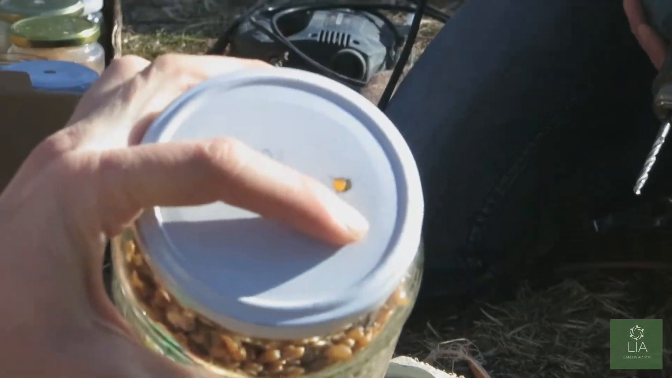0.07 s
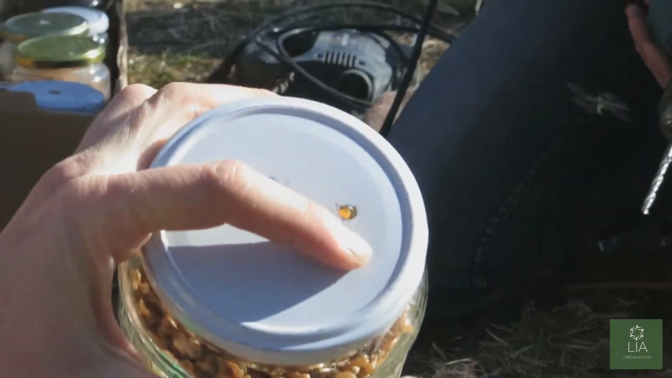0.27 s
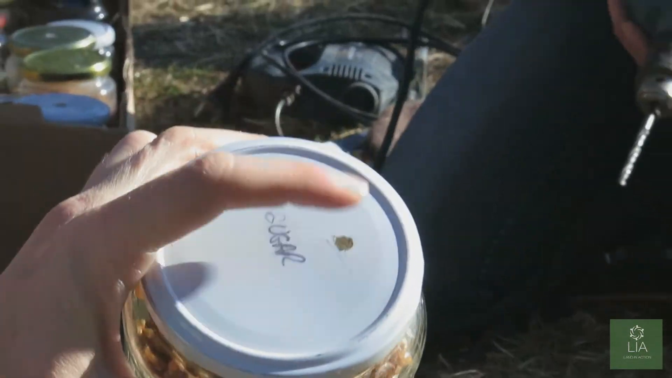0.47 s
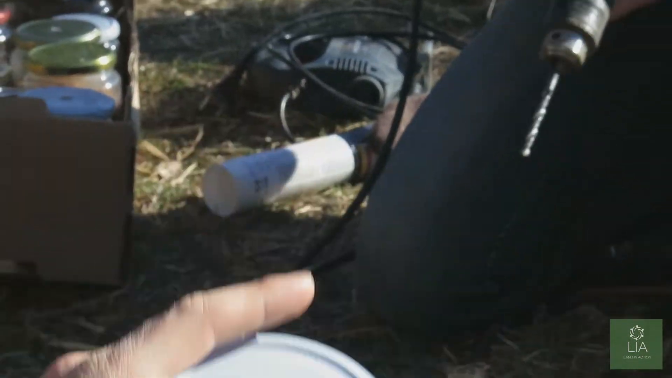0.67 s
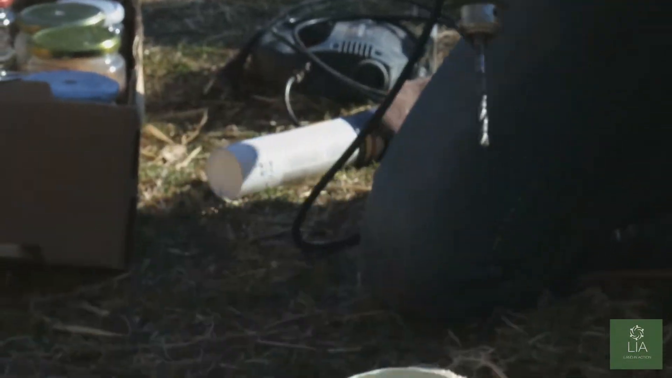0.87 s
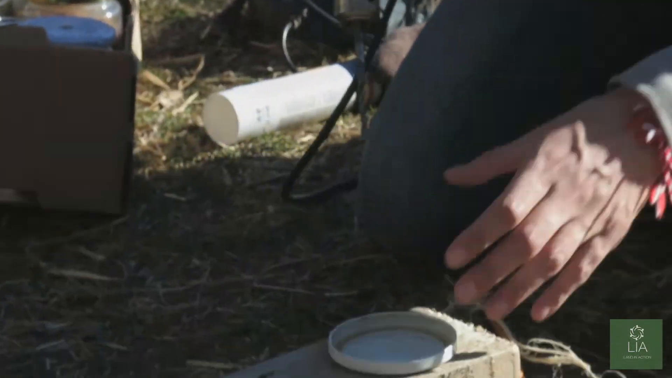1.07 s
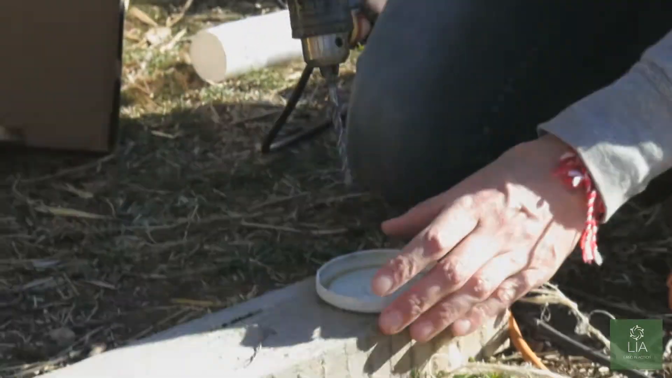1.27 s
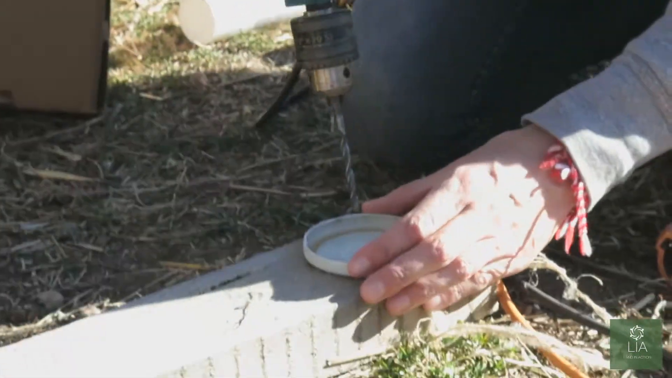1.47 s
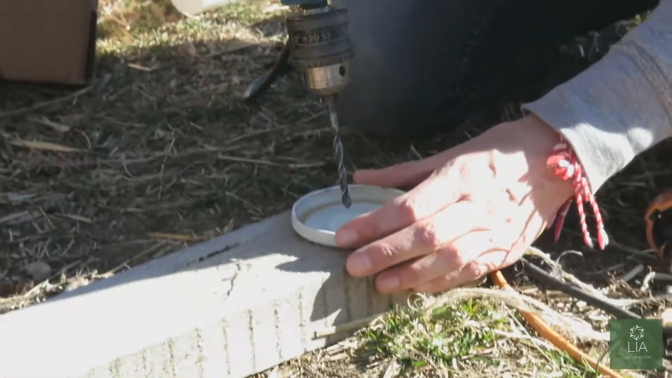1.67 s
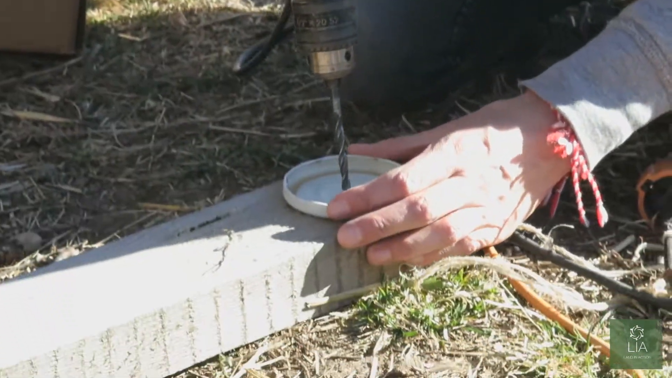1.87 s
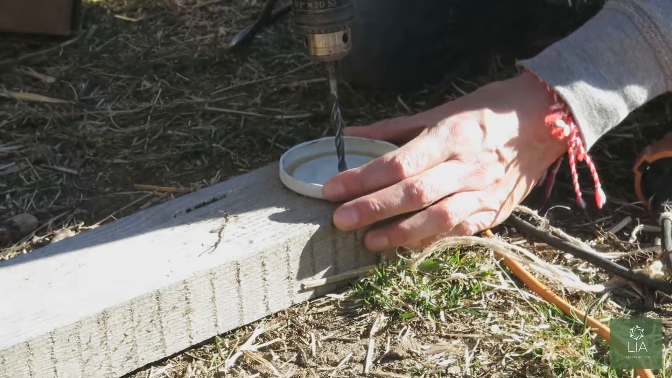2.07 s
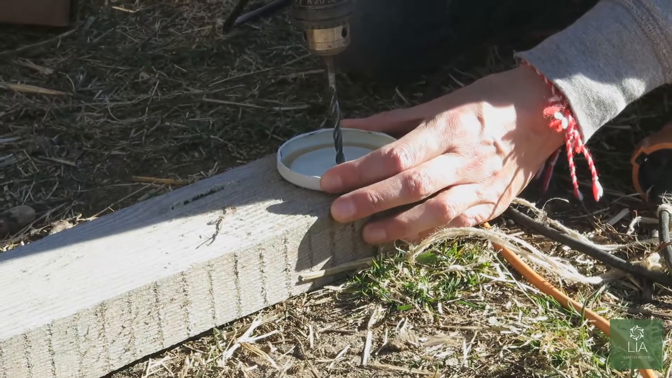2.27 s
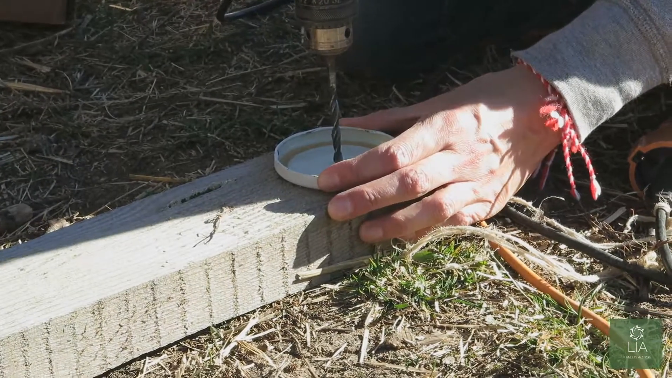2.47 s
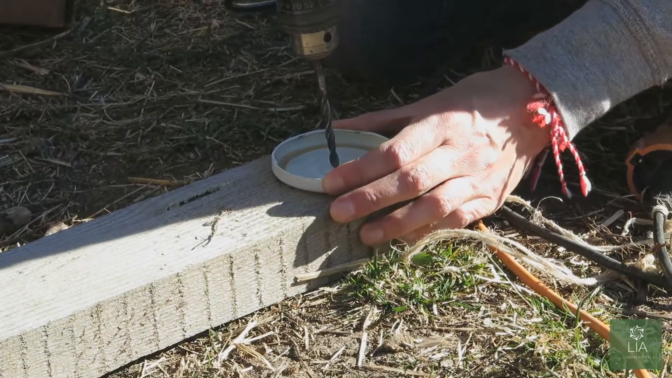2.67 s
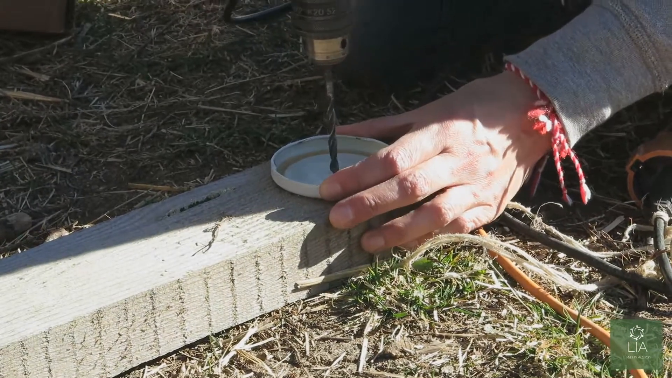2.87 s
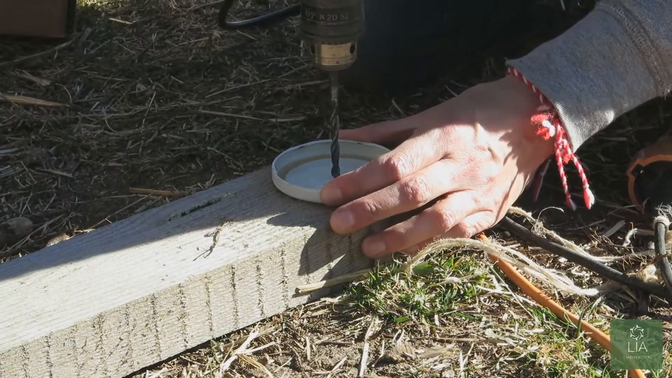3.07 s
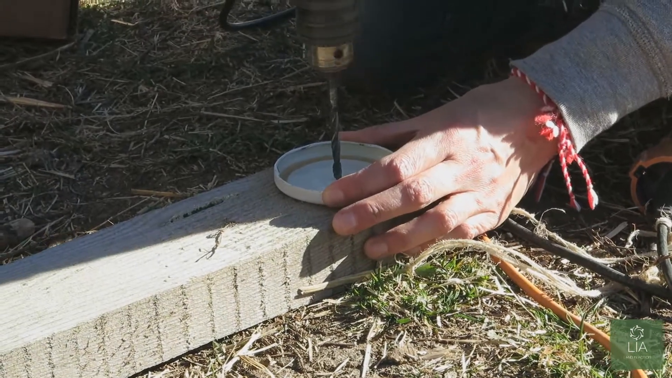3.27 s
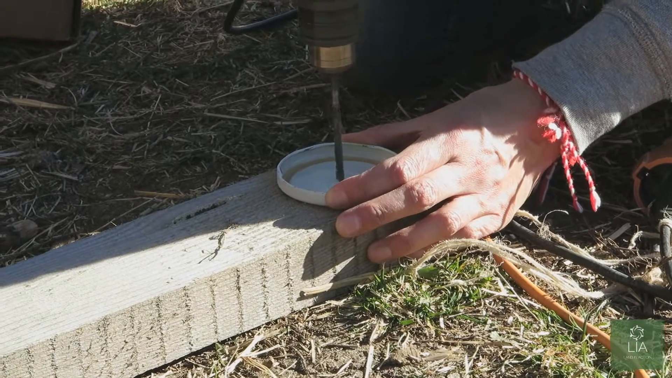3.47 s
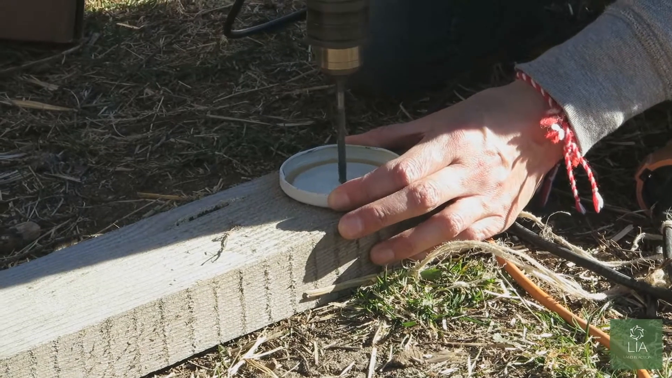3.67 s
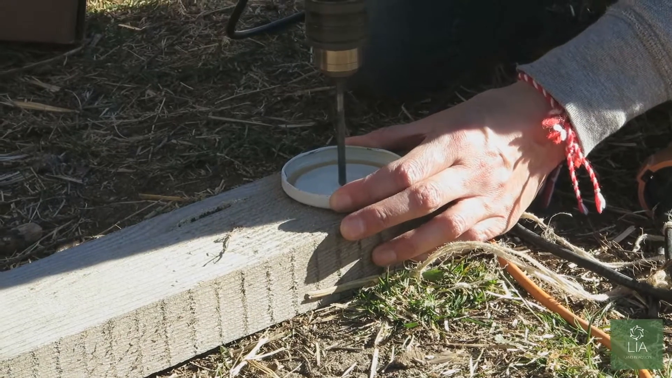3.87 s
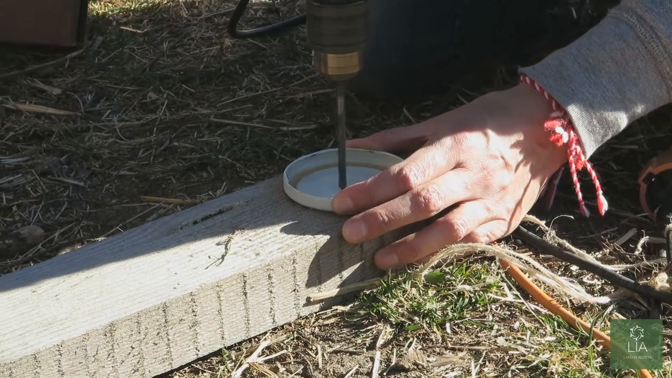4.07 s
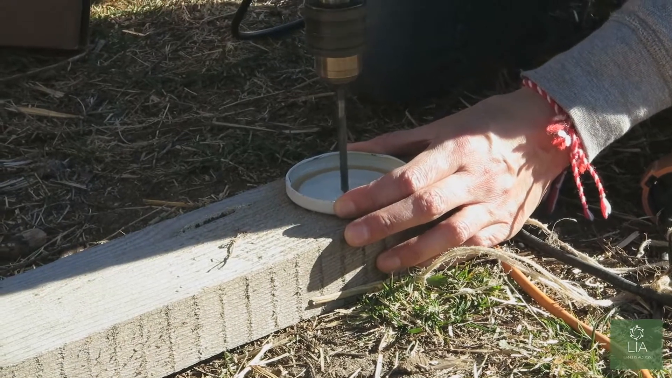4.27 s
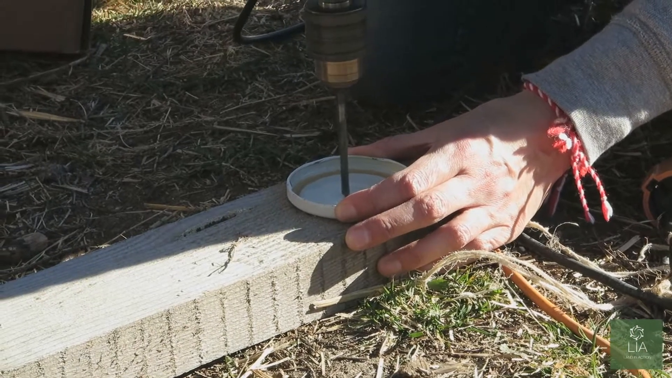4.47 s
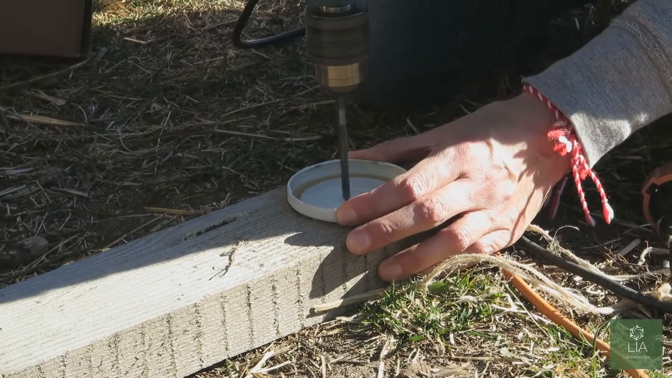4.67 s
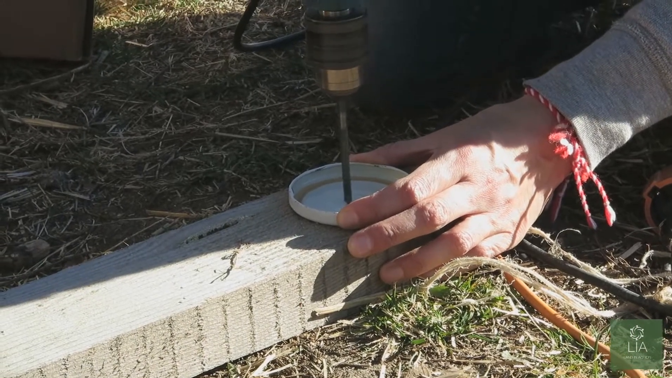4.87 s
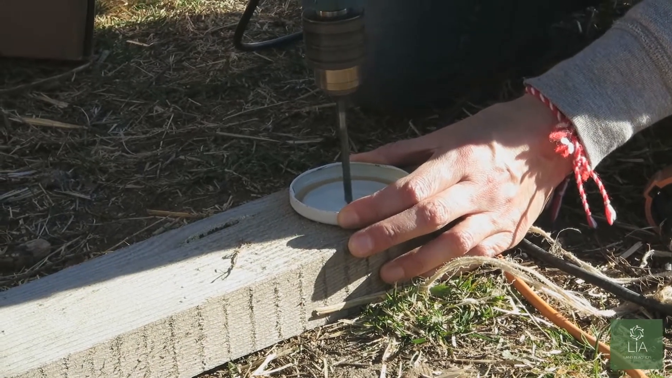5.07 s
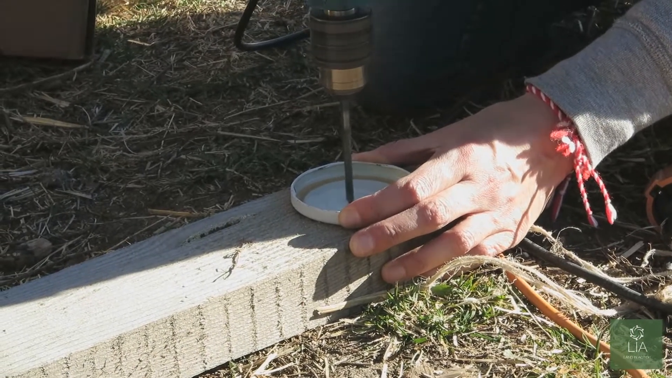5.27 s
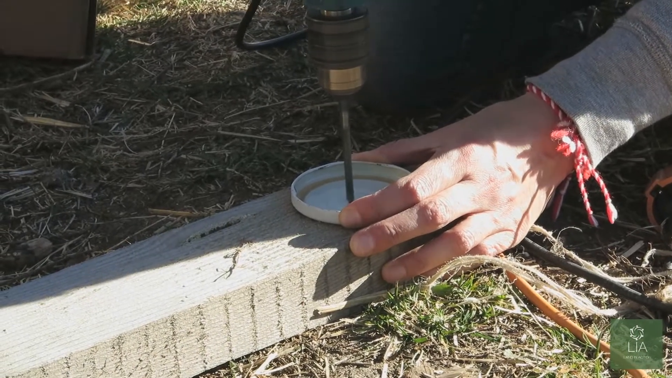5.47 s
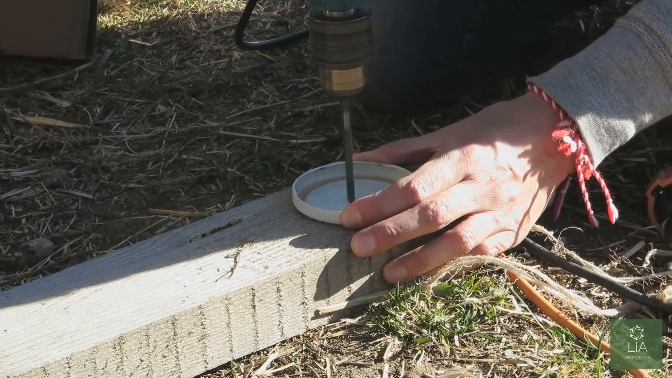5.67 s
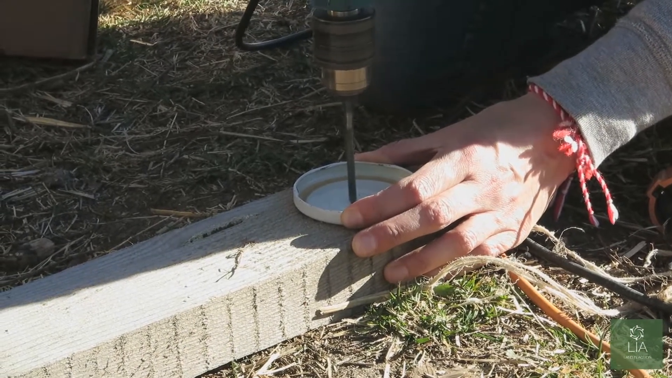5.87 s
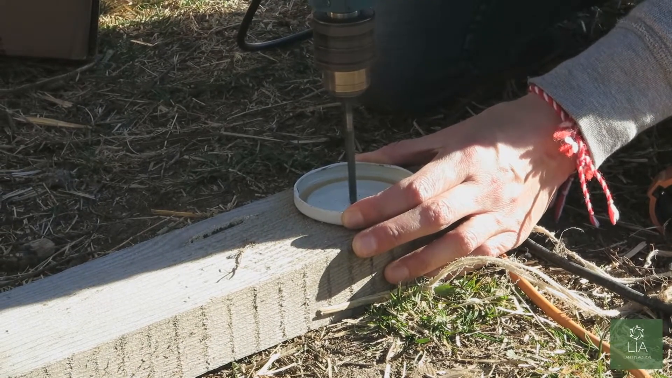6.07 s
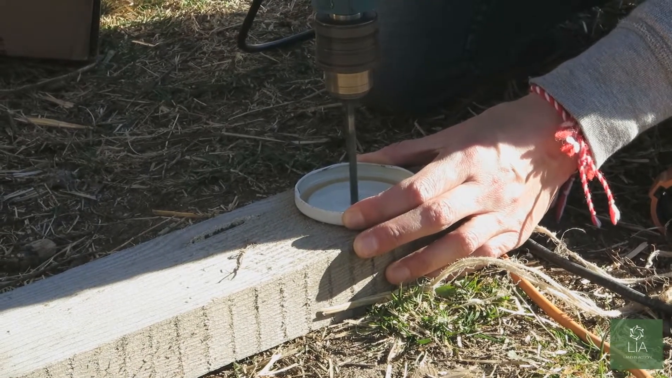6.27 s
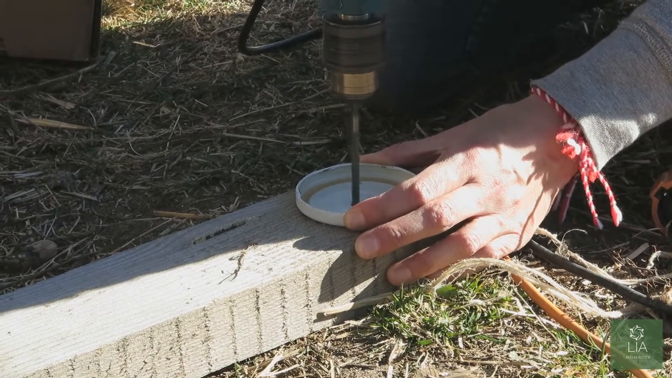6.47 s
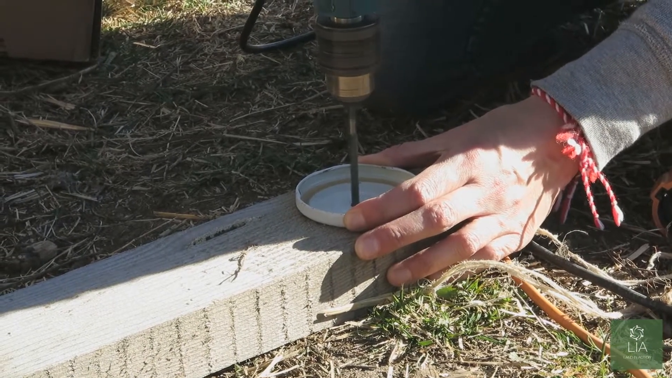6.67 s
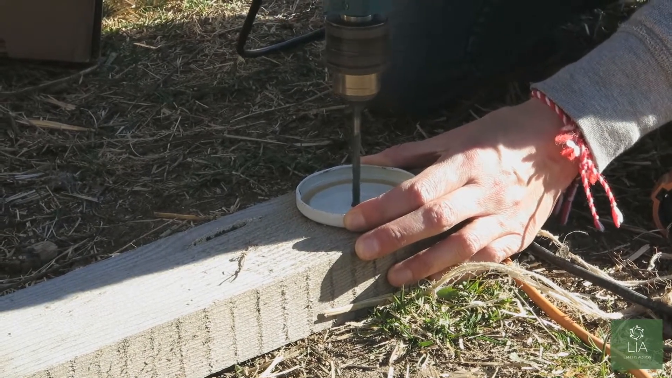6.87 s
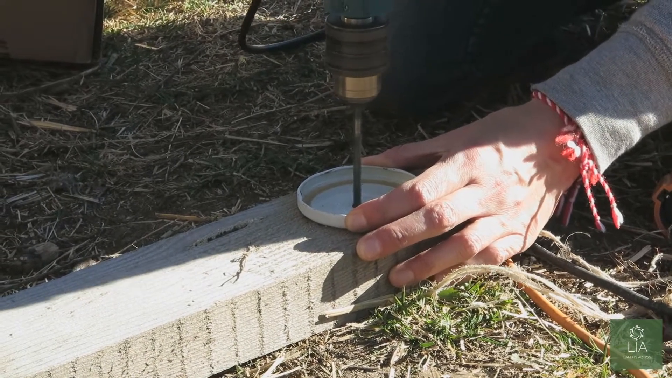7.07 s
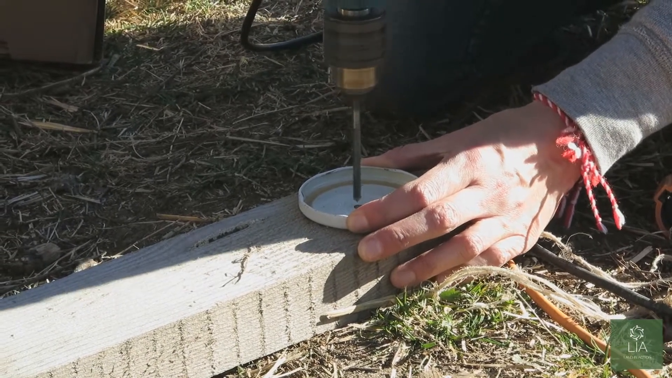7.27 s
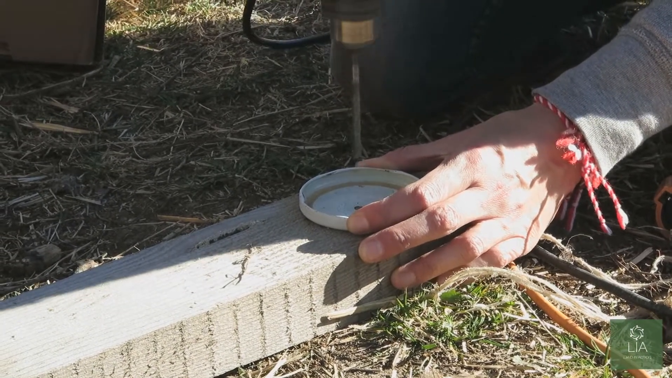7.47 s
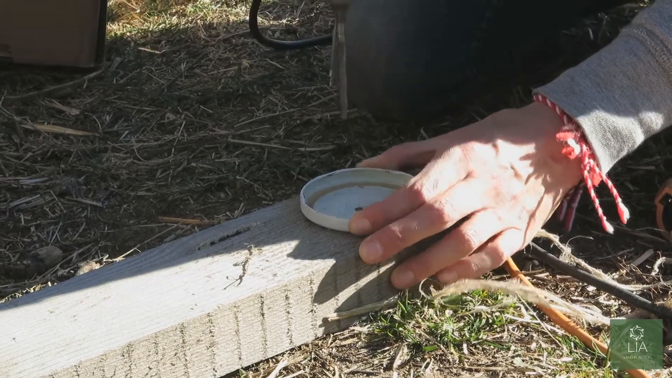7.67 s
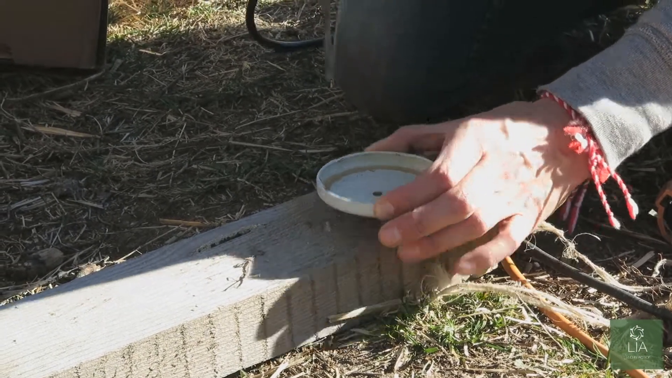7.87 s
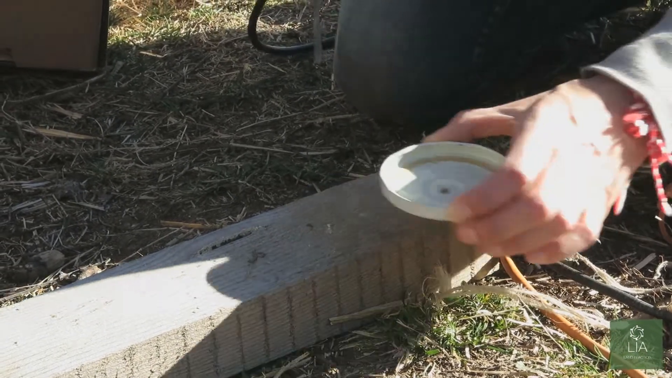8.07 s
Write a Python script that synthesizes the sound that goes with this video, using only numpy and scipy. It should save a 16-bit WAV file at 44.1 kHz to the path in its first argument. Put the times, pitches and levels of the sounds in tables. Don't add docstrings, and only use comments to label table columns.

```python
import sys
import numpy as np
from scipy import signal
from scipy.io import wavfile
from scipy.ndimage import uniform_filter1d

SR = 44100
rng = np.random.default_rng(int(sys.argv[2]) if len(sys.argv) > 2 else 0)


def log_audio(samples):
    frames = np.atleast_2d(samples).T
    limited = np.clip(frames, -1, 1)
    pcm = np.round(limited * 32767).astype(np.int16)
    wavfile.write(sys.argv[1], SR, pcm)


def level_to_linear(level):
    exponent = np.asarray(level, float) / 20
    return 10 ** exponent


N = 357651

SPIN_S, RELEASE_S = 3.553, 6.98
DUCK_S = 6.832
EDGE_HZ = 15740


def evened(x):
    return x / np.sqrt(np.mean(x ** 2) + 1e-20)


def read(points, hz):
    f, value = np.transpose(points)
    return np.interp(np.log(hz + 1), np.log(f + 1), value)


def curves(rows):
    s, *columns = np.transpose(rows)
    return [np.interp(np.arange(N) / SR, s, c) for c in columns]


def add(mix, s, sound):
    part = mix[..., round(s * SR):][..., :sound.shape[-1]]
    part += sound[..., :part.shape[-1]]


def drift(span_s):
    size = max(int(span_s * SR), 2)
    return evened(uniform_filter1d(uniform_filter1d(rng.standard_normal(N), size), size))


def low_cut(x, hz):
    return signal.sosfilt(signal.butter(2, hz, "high", fs=SR, output="sos"), x)


def resonate(x, hz, width):
    turn = np.exp(2j * np.pi * hz * np.arange(x.shape[-1]) / SR)
    r = np.exp(-np.pi * width / SR)
    return 2 * (turn * signal.lfilter([1 - r], [1, -r], x / turn)).real


def hiss(colour_db, same, patchy_db):
    frames, hz = N // 256 + 5, np.fft.rfftfreq(1024, 1 / SR)
    a, b, c, d, patches = rng.standard_normal((frames, 513, 5)).T
    patches = uniform_filter1d(uniform_filter1d(patches, size=10, axis=0), size=12, axis=1)
    patches = evened(patches)
    same = np.clip(read(same, hz), -1, 1)[:, None]
    left = a + 1j * b
    right = same * left + np.sqrt(1 - same ** 2) * (c + 1j * d)
    z = np.array([left, right])
    z *= level_to_linear(colour_db(hz[:, None], np.arange(frames) * 256 / SR) + patchy_db * patches)
    return evened(signal.istft(z, nperseg=1024, noverlap=768)[1][:, :N])


# time in seconds, shaft speed in Hz.
SHAFT_SPEED = [(3.553, 184), (3.59, 266.7), (3.63, 311), (3.66, 339), (3.7, 365), (3.79, 410), (3.9, 443),
               (4.15, 487), (4.4, 507.4), (4.7, 520.5), (5.6, 527), (6.1, 527.5), (6.5, 511), (7.0, 502.5),
               (7.3, 425), (7.53, 379.5), (7.8, 332.4), (8.11, 281)]


def drill():
    t = np.arange(N) / SR
    speed = curves(SHAFT_SPEED)[0]
    turns = np.cumsum(speed * (1 + 0.000605 * drift(0.0166))) / SR
    throb = np.cos(np.pi * 100.3 * (t - 3.592)) ** 2
    out = roar(t, turns, throb) + whines(t, speed, turns)
    return out + squeal(t, speed, throb) + knocks()


# centre in Hz, width in Hz, level in dB.
SHELL_MODES = [(1258, 99, 1.5), (1800, 130, 1.0), (3930, 170, 0.0), (4820, 510, 0.5), (5590, 800, -2.5),
               (7500, 340, -2.0), (8760, 440, -4.0), (10360, 250, -1.0), (11480, 120, 0.0),
               (11700, 250, -12), (13500, 450, -7), (14900, 440, 3.5)]
# centre in Hz, width in Hz, level in dB.
ECHO_NOTCHES = [(2490, 72, -2.5), (3500, 90, -2), (5155, 146, -7), (7200, 120, 2), (8900, 160, 0),
                (10230, 150, -6), (10930, 210, -4.5), (11660, 110, -8), (12700, 250, -0.5)]
# frequency in Hz, level in dB.
ROAR_COLOUR = [(150, -24), (400, -28), (700, -8.5), (1100, -2.5), (3000, -4), (7000, -5), (12000, -5),
               (16000, -19)]


def housing_db(hz, t):
    lift = np.clip((t - 7.12) / 0.85, 0, 1)
    bumps = sum(level_to_linear(2 * db - 6) / (1 + (2 * (hz - f) / width) ** 2) for f, width, db in SHELL_MODES)
    hollow_hz, hollow_width = 3020 - 455 * lift ** 2.3, 380 - 120 * lift
    hollow_db = 0.5 - 2.7 * np.clip((3.71 - t) / .04, 0, 1) + 1.47 * lift * (1 - lift) * 4.4
    bumps = bumps + level_to_linear(2 * hollow_db) / (1 + (2 * (hz - hollow_hz) / hollow_width) ** 2)
    dips_db = sum(db * np.exp(-((hz - f) / width) ** 2) for f, width, db in ECHO_NOTCHES)
    uncovered_db = 9 * lift ** 0.58 * np.exp(-((hz - 850) / 250) ** 2)
    treble_loss_db = 4.0 * lift ** 1.1 / (1 + (12800 / (hz + 1)) ** 16)
    early_top_db = 20 * (t < 3.6) * (hz > 15000)
    tilt_db = uncovered_db - treble_loss_db - early_top_db
    return read(ROAR_COLOUR, hz) + 10 * np.log10(0.27 + 1.77 * bumps) + dips_db + tilt_db


# time in seconds, level in dB.
ROAR_LEVEL = [(3.39, -47), (3.49, -35), (3.54, -26.5), (3.58, -19), (3.66, -18), (3.72, -16.5), (3.8, -18),
              (4.18, -20), (5.2, -19.5), (6.65, -20), (6.83, -22), (7.2, -25), (7.48, -28), (8.11, -32)]
# frequency in Hz, left-right likeness from -1 to 1.
ROAR_LIKENESS = [(130, 0.028), (290, 0), (640, 1), (1410, 0.94), (2400, 1), (3400, 0.87), (4500, 0.74),
                 (5800, 0.79), (8200, 0.56), (11000, 0.41), (13300, 0.82), (14200, 0.54), (16000, 0.9)]


def roar(t, turns, throb):
    noise = hiss(housing_db, ROAR_LIKENESS, patchy_db=0.5)
    low = signal.sosfiltfilt(signal.butter(2, 7000, fs=SR, output="sos"), noise)
    dull_db = -10 * np.exp(-np.maximum(t - 3.58, 0) / 0.12)
    noise = evened(low) + level_to_linear(dull_db) * evened(noise - low)
    wobble = .05 * np.cos(2 * np.pi * turns) + .05 * np.cos(np.pi * turns)
    early = np.clip((3.75 - t) / 0.22, 0, 1)
    beat = 1 + wobble + 0.38 * early * (t > SPIN_S) * (2 * throb - 1)
    recovery = np.clip(1 - (t - DUCK_S) / 0.34, 0, 1)
    duck_db = -6.5 * np.clip((t - DUCK_S) / 0.0033, 0, 1) * recovery
    running = np.clip((t - 3.385) / .01, 0, 1)
    return noise * beat * level_to_linear(curves(ROAR_LEVEL)[0] + duck_db + 0.49 * drift(0.014)) * running


def spun_up(t):
    return np.clip((t - SPIN_S) / 0.0039, 0, 1)


# tone in Hz, level in dB rms.
UNBALANCE = [(280, -48), (320, -47), (425, -43.5), (465, -62), (490, -53), (511, -45), (520, -41.5),
             (528, -38)]
# tone in Hz, level in dB rms.
FIELD = [(450, -59), (560, -41), (640, -50), (920, -50), (980, -40), (1015, -36), (1060, -37)]
# tone in Hz, level in dB rms.
BARS = [(6300, -40), (7600, -27), (8400, -40), (9250, -25), (9700, -27), (10100, -36), (10550, -23),
        (10950, -28), (11200, -38), (11500, -31), (12100, -50)]
# tone in Hz, level in dB rms.
BLADES = [(8600, -54), (9400, -28), (11200, -19), (11700, -22), (12200, -19), (12650, -37), (13300, -20),
          (14300, -16), (16000, -21)]
# tone in Hz, level in dB rms.
GEAR = [(2600, -50), (2900, -32), (3150, -27), (3450, -29), (3550, -50)]
# tone in Hz, level in dB rms.
BARS_COASTING = [(6800, -37), (7250, -40), (7500, -35), (7850, -38), (8100, -52), (10000, -50),
                 (10600, -40), (11200, -50)]
# tone in Hz, level in dB rms.
BLADES_COASTING = [(10400, -35), (11300, -29), (11650, -42), (11900, -33), (12300, -32), (12600, -45),
                   (12950, -36), (14000, -25), (15400, -26), (15800, -31)]
# tone in Hz, level in dB rms.
BARS_TWICE = [(9500, -50), (10400, -24), (11200, -29), (11700, -55)]
# tone in Hz, level in dB rms.
SIDEBAND = [(9700, -65), (10050, -27), (10900, -26), (11400, -60)]


def whines(t, speed, turns):
    coasting = np.maximum(t - RELEASE_S, 0)
    bitten_db = -57 * np.maximum(t - 6.6, 0)
    late_db = -15 * (t > DUCK_S)
    powered_db = -90. * (coasting > 0)
    freed_db = -90 - powered_db
    field_db = 0.48 * late_db - 200 * coasting
    orders = [(1.001, UNBALANCE, bitten_db), (2.008, FIELD, field_db),
              (24, BARS, powered_db), (37, BLADES, powered_db), (7, GEAR, powered_db),
              (24, BARS_COASTING, freed_db), (37, BLADES_COASTING, freed_db),
              (48, BARS_TWICE, 0), (36, SIDEBAND, late_db)]
    out = np.zeros((2, N))
    for order, shell, off_db in orders:
        audible = np.clip((EDGE_HZ + 300 - order * speed) / 200, 0, 1)
        db = read(shell, order * speed) + off_db + 2.0 * drift(0.041)
        level = np.sqrt(2) * level_to_linear(db + [[.8], [-.8]])
        out += level * spun_up(t) * audible * np.sin(2 * np.pi * order * turns)
    return out


# tone in Hz, level in dB rms.
PINION = [(2250, -23), (2520, -16.5), (2800, -17.5), (3210, -10), (3600, -24.5), (4100, -18), (4300, -28),
          (4450, -75)]


def squeal(t, speed, throb):
    teeth_hz = 12.1 * speed
    level = level_to_linear(read(PINION, teeth_hz)) * spun_up(t) * (t <= RELEASE_S) * (0.1 + throb ** 1.4)
    hz = (teeth_hz ** -16. + 4260 ** -16.) ** (-1 / 16)
    return 2.8 * level * np.sin(2 * np.pi * np.cumsum(hz) / SR)


# start in seconds, peak in dB, pitch in Hz, brightness in dB.
KNOCKS = [(3.3952, -22.5, 1800, -19), (3.4148, -21.5, 1770, -20), (3.4337, -20.5, 1840, -18),
          (3.4552, -16, 1960, -14), (3.473, -15.5, 1760, -13), (3.4924, -16, 1810, -14),
          (3.512, -10.5, 1370, -16), (3.532, -9.5, 1800, -12), (3.542, -10, 2480, -8),
          (3.5527, -7, 2100, -8)]


def knocks():
    out = np.zeros((2, N))
    u = np.arange(1300) / SR
    blow_shape = level_to_linear(-60 * np.maximum(u - .001, 0) / 0.02)
    rebound_shape = 0.33 * (u > .008) * level_to_linear(-60 * (u - .008) / 0.02)
    for s, db, knock_hz, bright_db in KNOCKS:
        blow = rng.standard_normal((3, len(u))) * (blow_shape + rebound_shape)
        blow[0, 24] += 4
        rattle = blow[0] + 0.42 * blow[1:]
        rattle = low_cut(low_cut(rattle * np.minimum(u / .0006, 1), 620), 620)
        body = 3.6 * resonate(resonate(rattle, knock_hz, 1800), knock_hz, 2000)
        shell = resonate(resonate(rattle, 3000, 3000), 3200, 3300)
        bright = level_to_linear(bright_db) * resonate(resonate(rattle, 8500, 7000), 8500, 7000)
        add(out, s, level_to_linear(db - 6) * (body + shell + bright))
    return out


# pitch in Hz, level in dB, 60 dB decay in seconds.
TIN_MODES = [(443, -7.5, 0.024), (863, -1.5, .03), (1108, -7, 0.059), (1330, 4.5, 0.024), (2730, 0, 0.02),
             (3600, -18, 0.052), (4400, -32, 0.036), (4790, -7.5, 0.054), (5880, -11.5, 0.021),
             (7900, -7, 0.027), (10400, -17, 0.022), (10520, -7, 0.022)]
# start in seconds, peak in dB.
TOUCH = (1.676, -2.2)


def lid():
    u = np.arange(3000) / SR
    ring = np.zeros(len(u))
    for k, (hz, db, t60) in enumerate(TIN_MODES):
        ring += (-1) ** k * level_to_linear(db - 60 * u / t60) * np.sin(2 * np.pi * hz * u)
    ring = low_cut(ring * (1 - np.exp(-u / 0.00021)), 230)
    crack = 0.17 * resonate(rng.standard_normal(len(u)), 3900, 10000) * level_to_linear(-60 * u / 0.031)
    ring = ring / abs(ring).max() + crack
    out = np.zeros((2, N))
    add(out, TOUCH[0], level_to_linear(TOUCH[1]) * np.array([ring, 0.67 * ring]))
    return out


# centre time in seconds, peak in dB,
# centre in Hz, length in seconds, width as a share of the centre.
TICKS = [(0.59, -28, 330, 0.021, .5), (0.6532, -16, 2340, 0.0033, 0.41), (0.58, -31, 3000, .002, 1.2),
         (.657, -37, 2300, 0.0086, .4), (.709, -36, 1100, .012, 0.55), (0.81, -41, 2300, .008, .25),
         (0.87, -33, 1800, .005, .5), (0.73, -47, 2400, .02, .2), (.71, -44, 11000, .012, .5),
         (0.84, -38, 2250, 0.02, 0.18), (0.86, -45, 2250, 0.05, .3), (.892, -47, 2400, .025, .25),
         (1.7, -34, 5500, .004, .5), (2.029, -25.5, 2700, 0.012, 1.2), (2.402, -43, 900, .1, 0.12),
         (.79, -40, 1800, 0.0091, .2), (3.505, -26, 7900, .02, .04), (3.521, -26, 7800, .02, .04),
         (.78, -43, 1400, .16, 1.3), (2.13, -31.5, 3200, 0.0057, 0.53), (3.075, -43, 11500, .012, .4),
         (3.285, -39.5, 830, 0.15, 0.05), (3.317, -26, 9000, 0.003, .15), (3.3155, -26, 7100, .0025, 1.5),
         (3.54, -31, 13000, .004, .3)]


def handling():
    out = np.zeros((2, N))
    u = np.arange(4000) / SR - .045
    for s, db, hz, length, share in TICKS:
        noise = rng.standard_normal((3, 4000))
        window = np.exp(-.5 * (u / (length / 3)) ** 2)
        grains = noise[0] + 0.57 * noise[1:]
        burst = resonate(resonate(grains, hz, share * hz), hz, share * hz)
        add(out, s - .045, level_to_linear(db - 6) * evened(burst) * window)
    return out


# time in seconds, common level in dB, opposed level relative to it in dB.
BREEZE = [(0, -46, -15), (.3, -42, -13), (.55, -40.5, -18), (1.05, -34.5, -10), (1.2, -46.5, -17),
          (2.1, -47.5, -23), (2.7, -48.5, -9), (3.8, -55.5, 1), (5.55, -59, -5), (5.66, -42, 0.5),
          (6.45, -37.5, -2), (6.75, -37, 2), (7.02, -41.5, -2), (7.2, -36, 8), (7.42, -32, -2),
          (7.6, -34, 1), (7.87, -35.5, -9), (8.05, -37, -1)]
# time in seconds,
# common level in dB, pitch in Hz.
HEAD_ON = [(0.21, -32.5, 217), (0.244, -27.5, 137), (0.367, -36, 150), (0.42, -16.5, 169),
           (0.444, -25, 210), (0.709, -41, 240), (0.769, -24, 250), (.803, -31, 130), (.82, -31, 150),
           (0.839, -31, 170), (.87, -33, 150), (0.922, -22, 162), (0.989, -24, 170), (1.012, -29, 260),
           (1.04, -32, 200), (1.061, -27, 150), (1.087, -16, 260), (1.297, -33, 190), (2.808, -38, 160),
           (2.837, -24, 133), (2.966, -23.5, 148), (2.99, -27, 120), (3.47, -31, 90), (3.52, -34, 100),
           (5.74, -31, 150), (5.836, -26, 150), (5.925, -29, 160), (6.26, -30, 170)]
# time in seconds, common level in dB, opposed level in dB.
ACROSS = [(5.89, -28, -20), (6.045, -30, -25), (6.064, -22, -17), (6.152, -28, -22), (6.167, -27, -16),
          (6.501, -32, -16), (6.564, -19, -17), (6.665, -23, -28), (6.686, -18, -13), (6.7, -20, -12),
          (6.721, -17, -10), (6.737, -22, -11), (6.755, -20, -3), (6.773, -25, -9), (6.806, -30, -15),
          (6.831, -10.5, 0.5), (6.868, -26, -12), (6.95, -33, -21), (6.962, -32, -26), (6.976, -40, -17),
          (7.073, -26, -11), (7.128, -38, -12), (7.143, -31, -16), (7.17, -22, -6.5), (7.189, -17, -8),
          (7.226, -24, -16), (7.252, -28, -18), (7.27, -31, -25), (7.284, -35, -31), (7.311, -30, -31),
          (7.327, -31, -24), (7.366, -17, -2), (7.384, -22, -7), (7.401, -29, -13), (7.417, -18, -3),
          (7.442, -20, -8), (7.456, -26, -19), (7.472, -28, -12), (7.503, -33, -16), (7.515, -30, -9.5),
          (7.529, -37, -15), (7.548, -29, -21), (7.566, -26, -20), (7.58, -26, -17), (7.616, -32, -19),
          (7.636, -32, -32), (7.673, -16.5, -7.5), (7.703, -23, -12), (7.717, -27, -13), (7.785, -18, -18),
          (7.817, -34, -21), (7.836, -26, -22), (7.928, -33, -24), (7.948, -19, -17), (7.973, -25, -22),
          (8.021, -19, -19), (8.05, -28, -27), (8.067, -22, -21)]
# frequency in Hz, level in dB.
COMMON_COLOUR = [(20, 3), (60, 10), (120, -3.5), (220, -3), (400, -16.5), (800, -29), (1600, -56)]
# frequency in Hz, level in dB.
OPPOSED_COLOUR = [(20, -28), (80, 12.5), (150, 11.5), (300, 3), (550, -10.5), (950, -35), (1600, -55)]


def wind():
    breeze_db, relative_db = curves(BREEZE)
    swell = level_to_linear([breeze_db + 2.8 * drift(0.015), breeze_db + relative_db + 5.4 * drift(0.015)])
    strikes, u = np.zeros((2, N)), np.arange(-2000, 2000) / SR
    buffets = [(s, db, db - 2.5, 1.07 * hz, .5) for s, db, hz in HEAD_ON]
    buffets += [(s, db, opposed_db, 310 + 6 * opposed_db, .4) for s, db, opposed_db in ACROSS]
    gust = 0.25 * np.exp(-np.where(u < 0, -u / 0.0077, u / 0.011)) + 0.051 * np.exp(-.5 * (u / 0.02) ** 2)
    edge_shape = np.exp(-.5 * (u / 0.00087) ** 2)
    lucks = rng.random((len(buffets), 2, 1))
    for (s, common_db, opposed_db, hz, cycles), luck in zip(buffets, lucks):
        hz, size = hz * np.array([[.7], [1.05]]), level_to_linear([[common_db], [opposed_db]])
        wave = np.cos(2 * np.pi * (hz * u + 0.36 * luck - .2)) * np.exp(-.5 * (u * hz / cycles) ** 2)
        add(strikes, s + u[0] - .0012, 1.1 * size * wave)
        leading_edge = np.cos(2 * np.pi * (520 * u + luck[0])) * edge_shape
        add(strikes[1], s + u[0] - .002, 0.38 * size[1] * leading_edge)
        add(swell, s + u[0], size * gust)

    def colour_db(hz, t):
        return np.array([read(COMMON_COLOUR, hz), read(OPPOSED_COLOUR, hz)])

    rumble = hiss(colour_db, [(20, 0), (2000, 0)], patchy_db=4.0)
    rumble /= uniform_filter1d(rumble ** 2, size=900) ** 0.54 + 0.054
    bright = np.array([[6.], [3.]]) * swell[1]
    rumble += bright * low_cut(low_cut(rumble, 180), 180)
    common, opposed = strikes + swell * rumble
    common, opposed = low_cut(common, 47.0), low_cut(opposed, 90)
    leak = np.cumsum(opposed) * 2 * np.pi * 40 / SR
    sharp = .22 * (opposed - uniform_filter1d(opposed, size=200))
    common = common + leak + sharp
    left = level_to_linear(-2.0) * common + level_to_linear(-1.2) * opposed
    right = level_to_linear(-0.5) * common - level_to_linear(-0.8) * opposed
    return np.array([left, right])


# frequency in Hz, level in dB per Hz.
YARD_COLOUR = [(18, -40), (30, -9), (98, -6.5), (584, -2), (801, -3.5), (913, -5), (1760, -8.5),
               (2060, -10), (3400, -11.5), (10500, -18), (16000, -23.5)]
# frequency in Hz, left-right likeness from -1 to 1.
YARD_LIKENESS = [(60, 0.83), (130, 0.85), (290, 0.49), (640, 0.015), (1410, 0.41), (3100, 0.42),
                 (6820, 0.068), (15000, -0.16)]


def yard():
    sag_db = -2 * np.maximum(np.arange(N) / SR - 3.7, 0)
    return hiss(lambda hz, t: read(YARD_COLOUR, hz), YARD_LIKENESS, patchy_db=1) * level_to_linear(-42.5 + sag_db)


def scene():
    return drill() + lid() + handling() + wind() + yard()


def roll_off(x):
    return signal.sosfilt(signal.butter(12, 17030, fs=SR, output="sos"), x)


def record(dry):
    rounded = dry / (1 + abs(dry) ** 6) ** (1 / 6)
    held = low_cut(rounded, 30) * .93
    edge = signal.firwin(2047, EDGE_HZ, window=("kaiser", 12), fs=SR)
    mix = signal.oaconvolve(held, edge[None], "same")
    return roll_off(mix)


dry = scene()
out = record(dry)
log_audio(out)
```